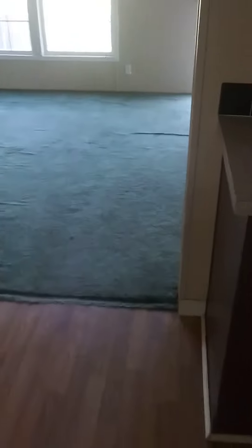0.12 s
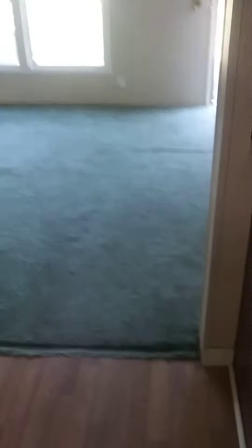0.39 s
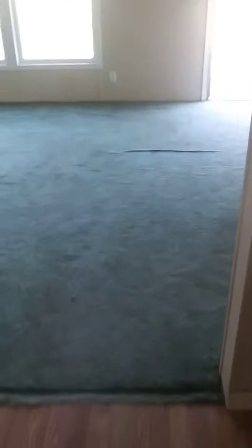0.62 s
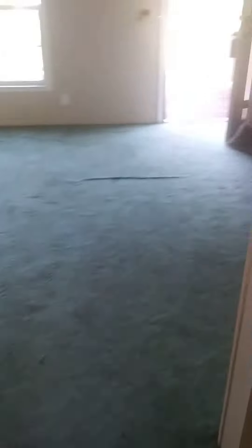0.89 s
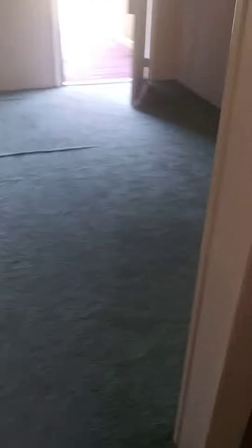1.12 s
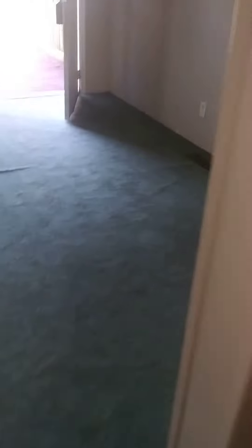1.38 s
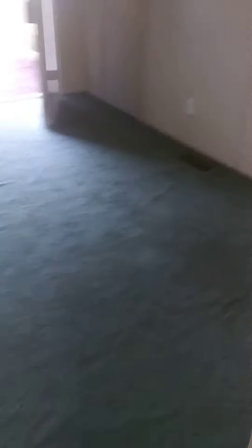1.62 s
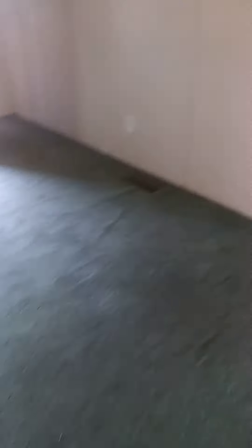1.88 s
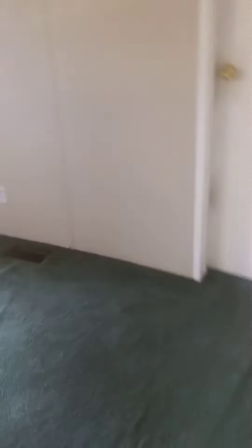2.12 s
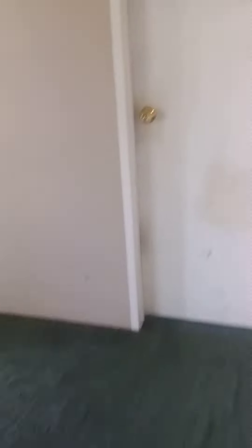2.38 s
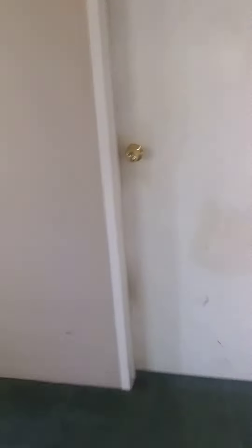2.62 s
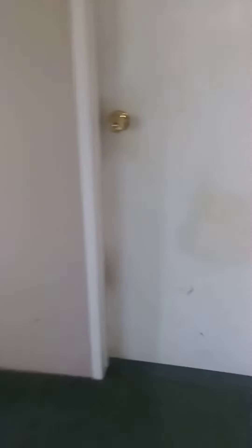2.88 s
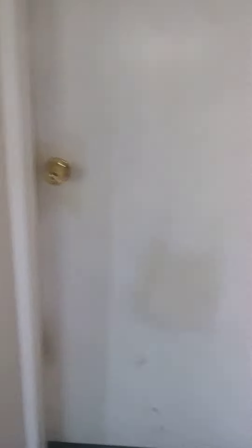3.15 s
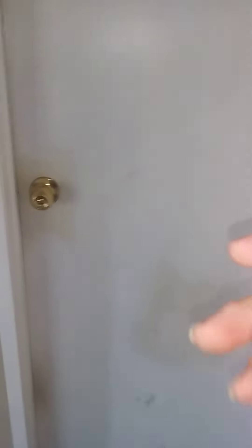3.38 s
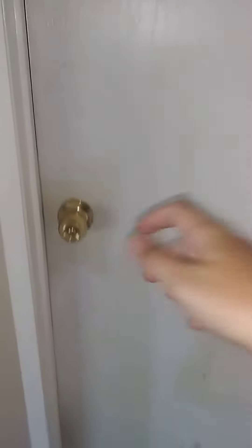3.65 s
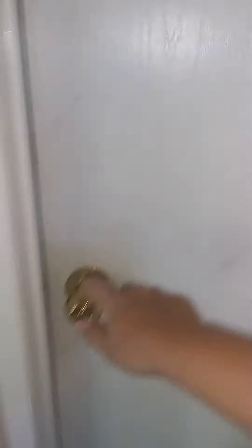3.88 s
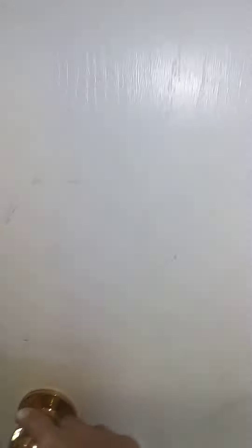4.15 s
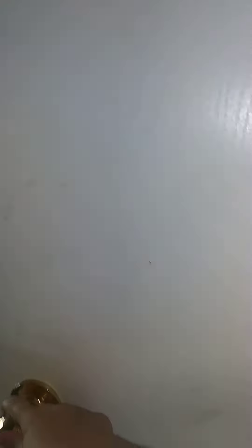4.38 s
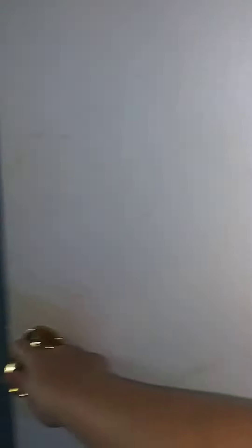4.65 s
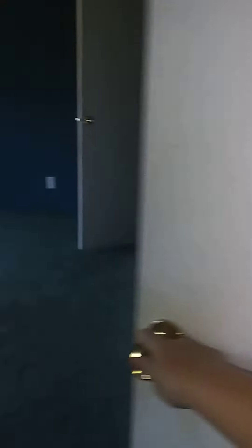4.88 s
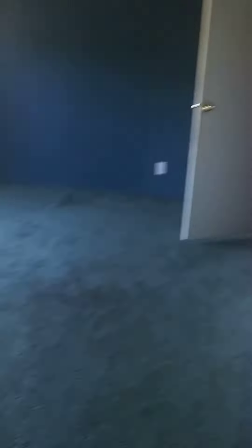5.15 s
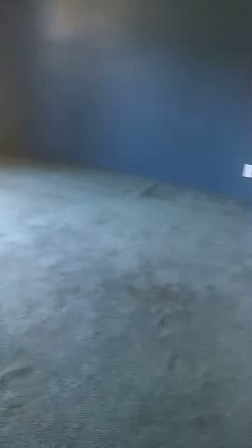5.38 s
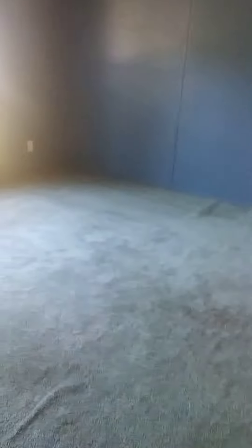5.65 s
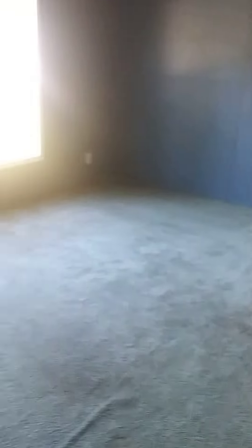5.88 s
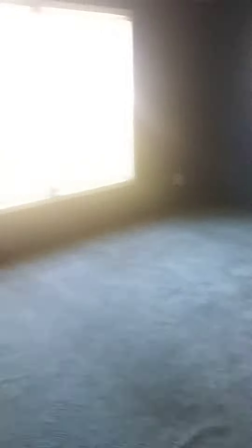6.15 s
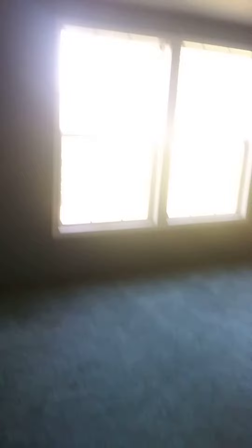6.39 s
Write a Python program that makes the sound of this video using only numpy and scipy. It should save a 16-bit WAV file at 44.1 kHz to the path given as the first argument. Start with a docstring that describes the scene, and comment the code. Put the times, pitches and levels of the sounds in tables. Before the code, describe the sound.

Bright key clicks, soft distant shoe knocks and loud handling bumps, followed by a metallic latch rattle, a sharp dry snap and final finger taps.

```python
"""Keys tick, shoes knock and thud far below, a latch rattles, fingers tap and rub on a phone's case;
someone walks through an empty house, turns a doorknob and opens a door.
Blows are dying noise bursts round a pitch, metal rings as damped sines, rubs and scuffs are dense slips
through resonances, clothes and rumble are noise bands; bare rooms answer with a noise tail."""
import sys
import numpy as np
from scipy import signal
from scipy.io import wavfile
from scipy.ndimage import uniform_filter1d

SR = 44100
rng = np.random.default_rng(int(sys.argv[2]) if len(sys.argv) > 2 else 0)


def amplitude_ratio(level_db):
    """Convert a level in decibels to the matching linear amplitude (field) ratio."""
    exponent = np.asarray(level_db, float) / 20
    return 10 ** exponent


def unload_audio(sound):
    """Save the sound as a 16-bit wav file, at the path given as the first command line argument."""
    columns = np.transpose(np.atleast_2d(sound))
    # keep every value between -1 and 1, then stretch to whole-number steps
    steps = np.round(np.clip(columns, -1, 1) * 32767)
    wavfile.write(sys.argv[1], SR, steps.astype(np.int16))


N = 287660

# walker's movement, as rustle of clothes: time_s, level_db
BUSTLE = [(0, -54.5), (.2, -71), (.45, -55.5), (.7, -70), (.95, -57.5), (1.25, -69), (1.5, -58),
          (1.848, -65.5), (2.5, -58.5), (2.9, -51), (3.199, -55.5), (3.45, -57), (3.651, -64.5),
          (3.95, -61.5), (4.6, -64.5), (4.95, -68.5), (5.2, -65.5), (5.65, -78.5), (5.9, -67.5),
          (6.1, -71.5), (6.3, -65.5), (6.52, -68)]


def rms_one(x):
    """Scale to rms 1."""
    return x / np.sqrt(np.mean(x ** 2) + 1e-20)


def at_hz(points, hz):
    """Read a table on a log-frequency axis."""
    points_hz, values = np.transpose(points)
    return np.interp(np.log(hz), np.log(points_hz), values)


def resonance(x, hz, width_hz):
    """Two-pole band-pass with gain 1 on top."""
    r = np.exp(-np.pi * min(width_hz, SR / 4) / SR)
    poles = [1, -2 * r * np.cos(2 * np.pi * hz / SR), r * r]
    return signal.lfilter([(1 - r * r) / 2, 0, (r * r - 1) / 2], poles, x)


def double_resonance(x, hz, width_hz):
    """Two equal resonances in series: steeper skirts."""
    return resonance(resonance(x, hz, width_hz), hz, width_hz)


def ring(clicks, hz, t60_s):
    """A unit click sets a damped sine of height 1 ringing."""
    r, w = amplitude_ratio(-60 / (t60_s * SR)), 2 * np.pi * hz / SR
    return signal.lfilter([0, np.sin(w)], [1, -2 * r * np.cos(w), r * r], clicks + 1e-18)


def add(track, start_s, sound, peak_db):
    """Lay a short sound in at a given peak level."""
    i = int(start_s * SR)
    track[i:i + len(sound)] += (amplitude_ratio(peak_db) * sound / np.abs(sound).max())[:N - i]


def bands(spectrum, shape):
    """Sum half-octave noise bands, coloured by the spectrum and shaped in time by shape(hz); rms 1."""
    edges_hz, out = 30 * 2 ** np.arange(0, 9.4, .5), 0
    white = rng.standard_normal((2, N))
    for k, (low_hz, high_hz) in enumerate(zip(edges_hz, edges_hz[1:])):
        hz = np.sqrt(low_hz * high_hz)
        envelope = amplitude_ratio(at_hz(spectrum, hz)) * shape(hz)
        sos = signal.butter(2, [low_hz, high_hz], "band", fs=SR, output="sos")
        out = out + envelope * signal.sosfilt(sos, white[k % 2, :len(envelope)])
    return rms_one(out)


def flicker(rate_hz, depth_db):
    """Random gain that changes about rate_hz times a second."""
    knots = rng.standard_normal(2000)
    return amplitude_ratio(depth_db * np.interp(np.arange(N) / SR * rate_hz, np.arange(len(knots)), knots))


def port(x):
    """Airborne sound peaks in the microphone's sound port."""
    port_hz, width_hz, peak_db = 7500, 920, 6.5
    return x + (amplitude_ratio(peak_db) - 1) * resonance(x, port_hz, width_hz)


def blows(rows, sharpness, broad_db, cut_hz, body_hz=None, body_t60_s=None):
    """Noise bursts die round a centre pitch, maybe over a dull thud; returns direct sound and room feed.

    Rows: start_s, peak_db, pitch_hz, burst_t60_s, [thud_db,] room_db."""
    out, t = np.zeros((2, N)), np.arange(SR // 6) / SR
    noise = rng.standard_normal((len(rows), 2, len(t)))
    noise[:, 0, 0] = 2.12   # firm first contact
    click = 1. * (t == 0)
    edge = signal.butter(2, cut_hz, "band", fs=SR, output="sos")
    for (start_s, peak_db, hz, t60_s, *thud_db, room_db), (burst_noise, thud_noise) in zip(rows, noise):
        burst = burst_noise * amplitude_ratio(-60 * t / max(t60_s, .002))
        pitched = double_resonance(burst, hz, hz / sharpness)
        crack = amplitude_ratio(broad_db) * signal.sosfilt(edge, burst)
        near = port(pitched + crack)

        far_pitched = double_resonance(click, hz, .9 * hz / sharpness)
        far_crack = amplitude_ratio(broad_db - 3.5) * signal.sosfilt(edge, click)   # the crack carries less far
        far = port(far_pitched + far_crack)
        # the walls get the blow's energy and smooth colour
        far = far * np.linalg.norm(near) / np.linalg.norm(far)

        if thud_db:   # many close, damped modes blur into low noise
            body = signal.butter(2, body_hz, "band", fs=SR, output="sos")
            thud = signal.sosfilt(body, thud_noise * amplitude_ratio(-60 * t / body_t60_s))
            thud = amplitude_ratio(thud_db[0]) * np.abs(near).max() * thud / np.abs(thud).max()
            near, far = near + thud, far + thud
        far_over_near_db = 20 * np.log10(np.abs(far).max() / np.abs(near).max())
        add(out[0], start_s, near, peak_db)
        add(out[1], start_s, far, peak_db + room_db + far_over_near_db)
    return out


def strokes(rows, fall_s, fall_db):
    """Each stroke swells to its peak, then falls away; returns curves of time_s, level_db, dullness_db."""
    return [[(peak_s - max(rise_s, .002), db - swell_db, dull_db),
             (peak_s, db, dull_db),
             (peak_s + fall_s, db - fall_db, dull_db)]
            for peak_s, rise_s, db, swell_db, dull_db in rows]


def friction(curves, slips_per_s, spread_db, clump_db, ringing):
    """Dense uneven slips follow the strokes and excite low and bright resonances, which ring on."""
    size = amplitude_ratio(spread_db * np.minimum(rng.exponential(1, N), 4))
    slips = size * rng.standard_normal(N) * (rng.random(N) < slips_per_s / SR)
    slips = slips * flicker(160, clump_db)   # slips come in clumps
    pressure, t = np.zeros((2, N)), np.arange(N) / SR   # low, bright
    for curve in curves:
        time_s, level_db, dull_db = np.transpose(curve)
        span = slice(int(time_s[0] * SR), int(time_s[-1] * SR))
        pressure[0, span] += amplitude_ratio(np.interp(t[span], time_s, level_db - 7 + dull_db / 2))
        pressure[1, span] += amplitude_ratio(np.interp(t[span], time_s, level_db - 4.5 - dull_db / 2))
    out = 0
    for modes, gain in zip(ringing, pressure):
        steady, played = sum(amplitude_ratio(db) * resonance([slips, slips * gain], hz, width_hz)
                             for hz, width_hz, db in modes)
        out = out + played / np.std(steady)
    return out


def keys():
    """Key on key: short bright bursts, plus a faint random jingle that follows the walker's bustle."""
    # clear ticks: start_s, peak_db, pitch_hz, room_db
    ticks = [(0.0134, -17, 6870, -18.5), (0.0224, -29, 6900, -8), (0.0882, -23.5, 7530, -16),
             (0.1014, -26.5, 7400, -10.5), (0.2204, -39.5, 4770, -13), (0.2374, -30.5, 8550, -7),
             (0.4743, -35, 7300, -15), (0.5222, -7.5, 7450, -11), (0.5724, -28, 8000, -11),
             (1.0999, -30.5, 6750, -3.5), (1.1603, -31, 6800, -11), (1.1754, -35, 8050, -3),
             (1.2845, -32.5, 7400, -12), (1.3064, -24, 8030, -12.5), (1.3758, -30.5, 6730, -24),
             (1.4062, -33, 7500, -13), (1.4626, -33, 7260, -4), (1.481, -33, 7500, -14),
             (1.5095, -32.5, 6800, -22), (1.6756, -29.5, 7360, -8), (1.6945, -38, 7420, -21),
             (1.718, -27, 7500, -16), (1.7654, -30.5, 8300, -8), (1.7734, -29.5, 7650, -19),
             (1.8981, -27, 6720, -8.5), (2.0043, -24, 7480, -9), (2.0213, -30, 7500, -21),
             (2.0522, -31.5, 7360, -5), (2.0692, -31.5, 7400, -7), (2.1171, -29.5, 7500, -15),
             (2.148, -31, 8400, -7), (2.1574, -34, 7100, -13), (2.1794, -33.5, 8760, -13),
             (2.2049, -29, 6730, -4.5), (2.3545, -20, 7530, -12), (2.385, -20, 8600, -31.5),
             (2.4934, -31.5, 7100, -20.5), (2.5316, -41, 2940, -21), (2.5511, -32, 7300, -22.5),
             (2.6035, -28.5, 3150, -4.5), (2.6155, -25.5, 6810, -12), (2.6264, -32, 7600, -18),
             (2.8135, -19, 8900, -9.5), (2.8285, -16.5, 8300, -21.5), (2.8554, -20, 7500, -13),
             (2.9716, -17.5, 6800, -10), (3.1328, -22.5, 7250, -43), (3.1862, -29, 8600, -15.5),
             (3.257, -18, 8530, -17.5), (3.2864, -32.5, 6600, -6.5), (3.3134, -22, 9500, -24.5),
             (3.3358, -19, 7460, -22), (3.3444, -30, 6840, -17.5), (3.3588, -20, 8450, -13.5),
             (3.3752, -6.5, 6630, -16.5), (3.3814, -22.5, 6650, -32.5), (3.3874, -13, 7000, -30),
             (3.3944, -12.5, 9200, -38), (3.4034, -29.5, 4870, -4.5), (3.477, -15, 7490, -16),
             (3.4824, -18, 7340, -23.5), (3.5488, -24.5, 4540, -20), (3.5818, -30, 8500, -6),
             (3.6232, -18, 7130, -23.5), (3.6296, -11, 9160, -38), (3.8631, -46, 6400, -24),
             (3.871, -29, 6520, -12), (4.3244, -38, 2560, -16), (6.1404, -31.5, 3122, -14),
             (6.2751, -43.5, 6500, -22), (6.4882, -42.5, 7000, -17)]
    burst_t60_s = 0.014
    count, first_s, last_s = 20, .05, 2.9
    jingle_db, spread_db, jingle_hz, jingle_room_db = -30.5, 3, 7450, -9   # level at the strongest bustle
    follows = 1.1   # dB per dB of bustle
    when, size, pitch = rng.random((count, 3)).T
    when_s = np.interp(when, [0, 1], [first_s, last_s])
    bustle_s, bustle_db = np.transpose(BUSTLE)
    shaken_db = np.interp(when_s, bustle_s, bustle_db - bustle_db.max())
    peaks_db = jingle_db + spread_db * (2 * size - 1) + follows * shaken_db
    pitches_hz = jingle_hz * (1 + .12 * (pitch - .5))
    jingle = zip(when_s, peaks_db, pitches_hz, np.full(count, jingle_room_db))
    rows = [(s, db, hz, burst_t60_s, room_db) for s, db, hz, room_db in [*ticks, *jingle]]
    return blows(rows, 4.22, -9.0, [2500, 14000])


def key_rings():
    """A few blows leave one key singing in three damped modes."""
    # modes of the key: pitch_hz, t60_s
    key_modes = [(4996, .28), (11810, .065), (15410, .085)]
    # blows that set it ringing: start_s, then level_db of each mode
    ring_blows = [(.014, -61, -60, -30), (.097, -61, -45, -36), (.348, -77, -49, -35),
                  (.523, -64, -52, -46), (2.004, -57, -60, -55), (4.064, -61, -60.5, -57.5),
                  (3.376, -32.5, -34, -24), (3.478, -48.5, -34.5, -22), (3.582, -60.5, -39, -43)]
    start_s, *levels_db = np.transpose(ring_blows)
    clicks = np.zeros((len(key_modes), N))
    clicks[:, (start_s * SR).astype(int)] = amplitude_ratio(np.array(levels_db))
    return sum(ring(c, hz, t60_s) for c, (hz, t60_s) in zip(clicks, key_modes))


def latch():
    """Knob, latch and hinge: metal bursts, shorter when brighter; dull blows boom most in the door panel."""
    # metal blows: start_s, peak_db, pitch_hz, room_db
    latch_blows = [(4.0624, -14, 3250, -11), (4.0702, -16, 4900, -20), (4.1191, -10, 2720, -11),
                   (4.1251, -16, 2820, -17), (4.1325, -18, 2550, -25), (4.153, -18, 3450, -12),
                   (4.416, -35, 2640, -17), (4.4299, -19, 8160, -35), (4.4484, -30, 4230, -30),
                   (4.4596, -32.5, 9100, -27), (4.5204, -36.5, 3530, -4), (4.681, -44.5, 3610, -7.5),
                   (4.697, -45, 2480, -17), (4.7317, -43, 7700, -14), (4.8268, -31, 6600, -8),
                   (4.8329, -27, 3650, -13), (5.4195, -43, 2370, -20), (5.5188, -36.5, 2510, -13),
                   (5.6666, -38, 2620, -8.5), (5.674, -26, 2650, -11), (5.6802, -28, 3910, -8),
                   (5.6875, -26.5, 2570, -27), (5.7016, -37, 4840, -15), (5.7115, -24, 2590, -10),
                   (5.7178, -47, 3500, -13)]
    t60_s, panel_db = 0.03, -11   # both at 2.5 kHz
    shortening, panel_db_per_octave = 0.29, -13
    rows = []
    for start_s, peak_db, hz, room_db in latch_blows:
        burst_t60_s = t60_s * (hz / 2500) ** -shortening
        thud_db = panel_db + panel_db_per_octave * np.log2(hz / 2500)
        rows.append((start_s, peak_db, hz, burst_t60_s, thud_db, room_db))
    return blows(rows, 1.86, -12.5, [1500, 12000], [110, 900], 0.11)


def spring():
    """The latch spring rings once in damped modes as the knob snaps back."""
    # modes of the spring: pitch_hz, relative_db, t60_s
    spring_modes = [(4861, 0, .34), (4874, -9, .3), (9243, -5, .15), (9728, -1, .3), (9740, -3, .3),
                    (10370, 1, .17)]
    start_s, level_db = 5.7025, -45.5
    click = amplitude_ratio(level_db) * (np.arange(N) == int(start_s * SR))
    return sum(amplitude_ratio(db) * ring(click, hz, t60_s) for hz, db, t60_s in spring_modes)


def snap():
    """A hard dry snap close to the microphone: one very short, broad burst."""
    # the snap: start_s, peak_db, pitch_hz, burst_t60_s, room_db
    snap_blow = [(4.7624, -3, 8600, 0.0028, -28.5)]
    return blows(snap_blow, 0.86, -4.5, [400, 15000])


def steps():
    """Soles knock as pitched bursts and the floor thuds as low noise."""
    # shoes on the floor: start_s, peak_db, pitch_hz, thud_db (relative to the knock), room_db
    footfalls = [(0.268, -39, 1160, -40, -9), (0.338, -44, 657, -9, -4), (0.377, -38.5, 710, -13, -8),
                 (0.448, -47.5, 1100, -13, 0), (0.544, -42, 1080, -9, -3), (0.846, -36.5, 1160, -34, -2.5),
                 (0.928, -42, 1050, -33, 1), (0.999, -41, 580, -8.5, -3), (1.087, -35, 1120, -14, -1.5),
                 (1.455, -42.5, 1300, -27, -1.5), (1.498, -37.5, 590, -18, -7.5),
                 (1.573, -41, 744, -20, -6), (1.665, -36.5, 990, -14, -6.5), (1.971, -46.5, 1660, -13, 0),
                 (2.197, -46, 248, -4, -8), (3.426, -31.5, 1180, -13.5, -18),
                 (3.755, -46, 518, -36.5, -1.5), (3.921, -44, 587, -22.5, -20.5),
                 (4.348, -44.5, 335, 4, -1.5), (4.818, -31, 1045, -17, -10)]
    burst_t60_s = 0.048
    rows = [(s, db, hz, burst_t60_s, thud_db, room_db) for s, db, hz, thud_db, room_db in footfalls]
    return blows(rows, 1.82, -11.0, [200, 5000], [70, 400], 0.23)


def taps():
    """A finger tap pushes the case: a few damped cycles, a slower settling and a sharp noise edge."""
    # taps: start_s, peak_db, case_hz, ringing_cycles (to -60 dB), edge_gain_db
    finger_taps = [(2.382, -21, 470, 5.9, 7), (2.405, -15.5, 298, 1.4, -2), (2.608, -33.5, 670, 1.2, -11),
                   (2.666, -26, 299, 1.2, -5), (2.726, -30.5, 362, 0.8, -14), (2.761, -25, 964, 2.2, -30),
                   (2.773, -20, 260, 3.1, -22), (2.952, -24.5, 540, 8.3, -15), (2.982, -16, 270, 1.2, -13),
                   (3.022, -32, 183, 8, -14), (3.141, -30.5, 141, 6.3, 3), (6.052, -28.5, 299, 3.8, -27),
                   (6.062, -35, 273, 4.1, -19), (6.12, -36, 1150, 2.4, 10), (6.153, -15.5, 934, 0.93, -20),
                   (6.17, -8.5, 860, 2.7, -41), (6.177, -18, 161, 1.5, 25), (6.298, -41.5, 254, 6.5, -26),
                   (6.368, -20.5, 520, 4.4, 11.5), (6.39, -28.5, 751, 2.5, 6), (6.416, -15, 460, 3.4, 7.5),
                   (6.433, -17, 1030, 7.7, -18), (6.436, -6, 974, 7.1, 3.5)]
    out, click = np.zeros(N), -1. * (np.arange(SR // 10) == 8)
    edge_t60_s = 0.0022
    decay = amplitude_ratio(-60 * np.arange(len(click)) / (SR * edge_t60_s))
    noise = rng.standard_normal((len(finger_taps), len(click))) * decay
    for (start_s, peak_db, hz, cycles, edge_db), edge_noise in zip(finger_taps, noise):
        push = ring(click, hz, max(cycles, .3) / hz)
        settling = amplitude_ratio(-39.5) * ring(click, 259, 0.18)
        edge = amplitude_ratio(edge_db) * resonance(edge_noise, 1870, 4800)
        add(out, start_s, push + settling + edge, peak_db)
    return out


def rubs():
    """Skin jerks over the case in coarse slips that swell until it lets go."""
    # rubs: let_go_s, rise_s, level_db (at let-go), swell_db, dullness_db
    finger_rubs = [(2.44, 0.048, -48.5, -2.5, 5), (2.58, 0.026, -40, 5.5, 4), (2.674, 0.017, -30, 30, -2),
                   (2.778, 0.014, -35, 12, 0), (2.888, 0.11, -31.5, 14.5, 9.5), (2.905, .032, -1.5, 33, 2),
                   (2.99, 0.052, -36, 5, 7), (3.06, 0.073, -47, -7, 12), (3.102, 0.04, -30.5, 12, -5.5),
                   (3.14, 0.051, -30.5, 3.5, 2.5), (3.185, 0.045, -73, 13, 6), (3.42, 0.078, -53, -7, -12),
                   (6.052, 0.0117, -36.5, 18.5, 1.5), (6.09, .036, -52, -9.5, 3),
                   (6.184, .058, -49, 1.5, 19.5), (6.221, 0.026, -29.5, 11.5, 14), (6.23, .011, -16, 8, 13),
                   (6.258, 0.034, -67, 17, 10), (6.368, 0.11, -50, 12.5, 8), (6.42, 0.047, -40, 9, 13.5),
                   (6.437, 0.014, -27.5, 5.5, 6), (6.459, 0.012, -35, -3, 1)]
    # low resonances: pitch_hz, width_hz, relative_db
    case_modes = [(280, 200, -9), (490, 70, -4), (645, 60, -1), (780, 70, 2), (950, 100, -4),
                  (1150, 200, -8)]
    # bright resonances: pitch_hz, width_hz, relative_db
    skin_modes = [(1880, 2400, 5), (3120, 1600, 0), (3736, 480, 6), (6140, 420, 4.5), (7000, 950, -1),
                  (8650, 1600, -23)]
    fall_s, fall_db = 0.0077, 20
    return friction(strokes(finger_rubs, fall_s, fall_db), 5000, 2.5, 3.2, [case_modes, skin_modes])


def scuffs():
    """Shoes drag on carpet: dense slips that swell and fade."""
    # scuffs: peak_s, rise_s, level_db, swell_db, dullness_db
    shoe_scuffs = [(.5, 0.11, -58, 32, 18), (2.2, 0.098, -61, 13, 29.5), (3.77, 0.025, -50, 10, 10),
                   (3.86, 0.087, -54, 1.5, -1), (4.83, .095, -57.5, 0, -12.5),
                   (5.11, 0.067, -54.5, 19.5, -1.5), (5.4, 0.013, -59.5, 3.5, 7),
                   (5.525, 0.013, -60, -8, 3.5)]
    fade_s, fade_db = 0.078, 14
    # pitch_hz, width_hz, relative_db
    low_modes = [(292, 280, 2.0), (1010, 2200, 0.5)]
    bright_modes = [(3150, 2600, 9.5), (7500, 220, -18.0)]
    return friction(strokes(shoe_scuffs, fade_s, fade_db), 30000, 2.2, 2.6, [low_modes, bright_modes])


def air():
    """Low rumble and high rustle are noise that follows the walker's bustle, each slightly patchy."""
    # rumble spectrum: freq_hz, relative_db_per_hz
    rumble_spectrum = [(24, -42), (40, -11.5), (139, 3), (209, 3), (702, -2.5), (1070, -1), (2000, -9),
                       (2600, -39), (4400, -120)]
    # rustle spectrum: freq_hz, relative_db_per_hz
    rustle_spectrum = [(1200, -9.5), (1800, 5), (3600, 2.5), (5300, 0), (7000, 2.5), (10000, 0),
                       (16000, -14.5)]
    rumble_db, follows = -65, 0.74   # level at mean bustle; dB per dB of bustle
    bustle_db = np.interp(np.arange(N) / SR, *np.transpose(BUSTLE))
    rumble_gain = amplitude_ratio(rumble_db + follows * (bustle_db - bustle_db.mean()))
    rumble = rumble_gain * bands(rumble_spectrum, lambda hz: flicker(2.7, 1.7))
    rustle = amplitude_ratio(bustle_db) * bands(rustle_spectrum, lambda hz: flicker(14, 0.84))
    return rumble + rustle


def room(x):
    """Bare walls: a noise tail that builds over some milliseconds and dies band by band."""
    # reverberation: freq_hz, t60_s
    room_t60 = [(150, 0.63), (400, 0.59), (1040, 0.5), (2760, 0.45), (7280, 0.45), (14000, 0.17)]
    t = np.arange(int(.9 * SR)) / SR
    tail = bands([(30, 0), (20000, 0)], lambda hz: amplitude_ratio(-60 * t / at_hz(room_t60, hz)))
    tail = tail * np.clip((t - .004) / 0.0056, 0, 1)
    return signal.fftconvolve(x, tail / np.sqrt(np.sum(tail ** 2)))[:N]


def dips():
    """Gain that falls for a moment, with soft edges."""
    # brief level dips: start_s, end_s, gain_db
    level_dips = [(3.677, 3.744, -2.5), (5.297, 5.32, -8), (5.344, 5.386, -11.5), (5.602, 5.67, -7.5)]
    t = np.arange(N) / SR
    gain_db = sum(db * ((t > start_s) & (t < end_s)) for start_s, end_s, db in level_dips)
    return amplitude_ratio(uniform_filter1d(gain_db * 1., size=200))


def scene():
    """Keys, latch, snap and steps reach the room; taps and rubs go straight through the case."""
    direct, feed = keys() + snap() + latch() + steps()
    rings = key_rings() + spring()
    ring_room_db = -11
    walls = room(feed + amplitude_ratio(ring_room_db) * rings)
    mix = direct + rings + walls + scuffs() + taps() + rubs() + port(air())
    return (mix * dips())[None]


def microphone(x):
    """Bass and top are cut; the treble cut levels off at a shelf."""
    low_hz, top_hz, shelf_db = 103.3, 9090, -38
    x = signal.sosfilt(signal.butter(4, low_hz, "high", fs=SR, output="sos"), x)
    return signal.sosfilt(signal.butter(5, top_hz, fs=SR, output="sos"), x) + amplitude_ratio(shelf_db) * x


def top_cut(x):
    """Nothing passes above the cut-off."""
    return signal.sosfilt(signal.butter(12, 16480, fs=SR, output="sos"), x)


def record(dry):
    """The capsule rounds the highest peaks; the amplifier adds faint hiss."""
    overload, hiss_db = .72, -86   # full-scale limit; white noise rms before its low-pass
    heard = microphone(overload * np.tanh(dry / overload))
    low_pass = signal.butter(10, 12900, fs=SR, output="sos")
    hiss = signal.sosfilt(low_pass, rng.standard_normal(dry.shape))
    return top_cut(heard + amplitude_ratio(hiss_db) * hiss)


dry = scene()
out = record(dry)
unload_audio(out)
```